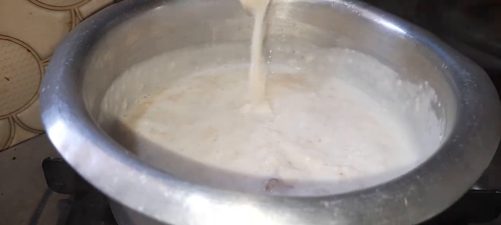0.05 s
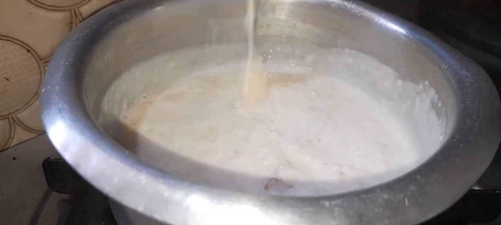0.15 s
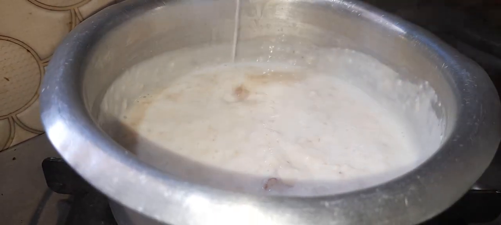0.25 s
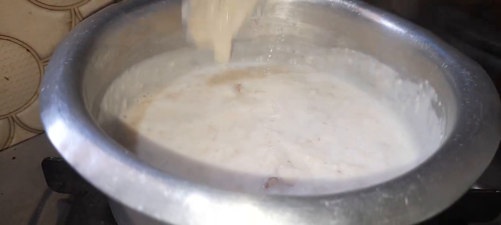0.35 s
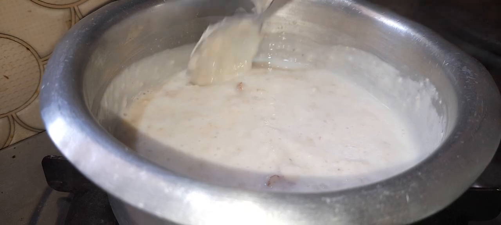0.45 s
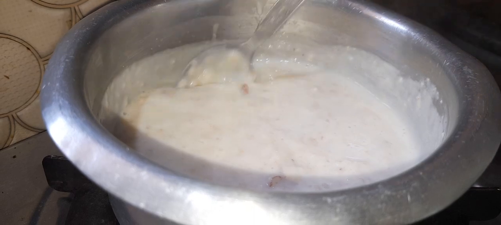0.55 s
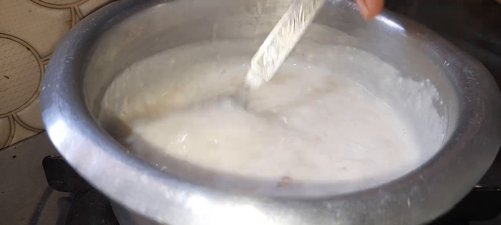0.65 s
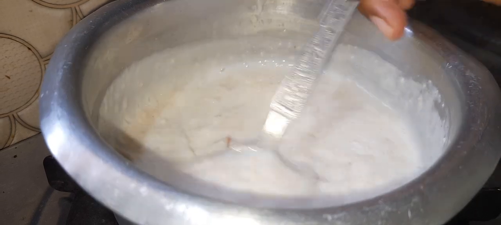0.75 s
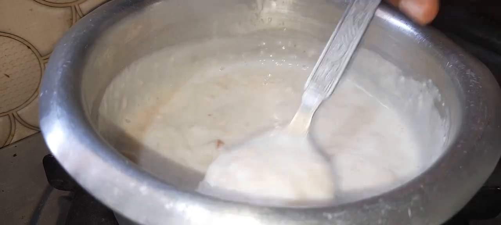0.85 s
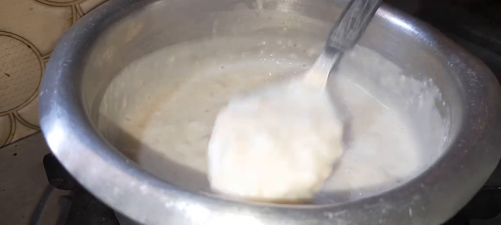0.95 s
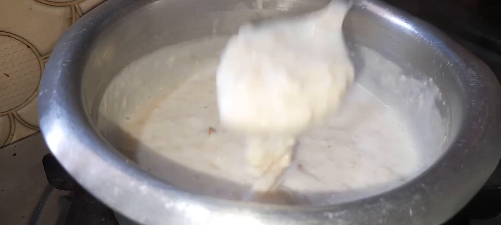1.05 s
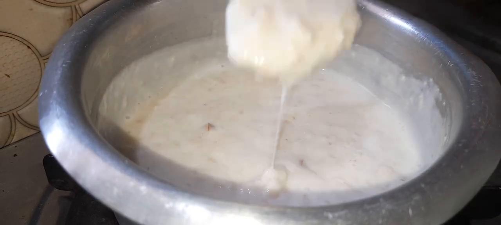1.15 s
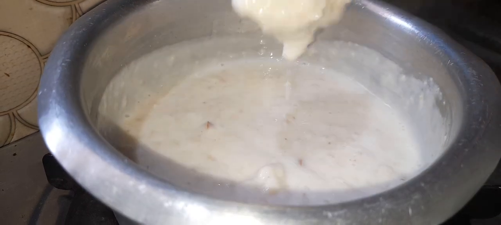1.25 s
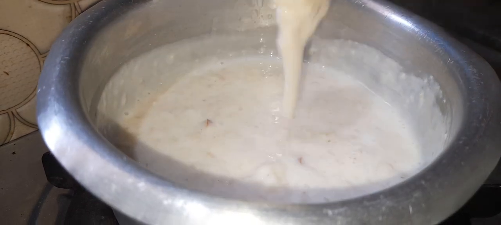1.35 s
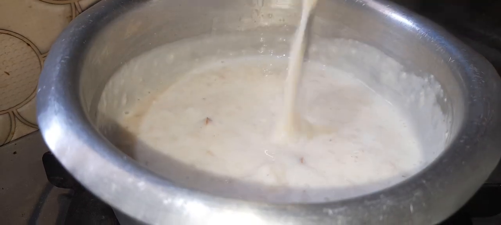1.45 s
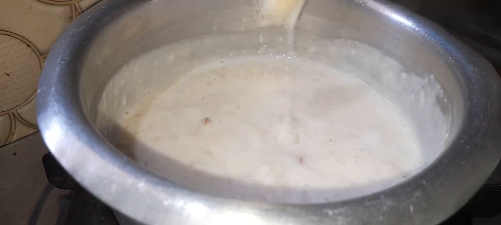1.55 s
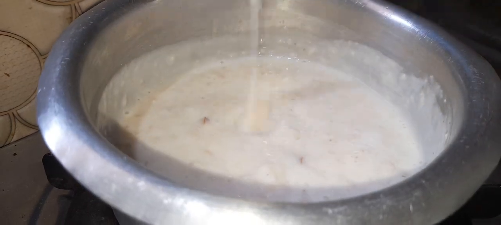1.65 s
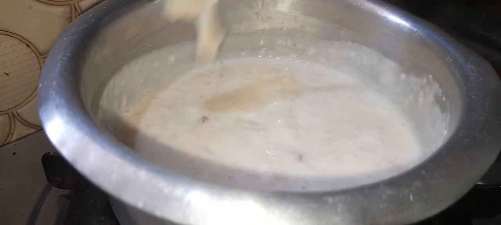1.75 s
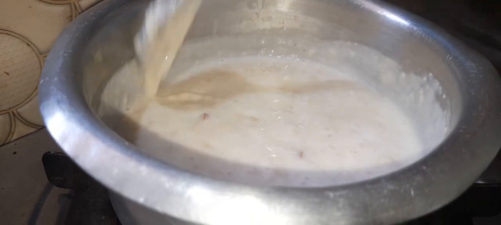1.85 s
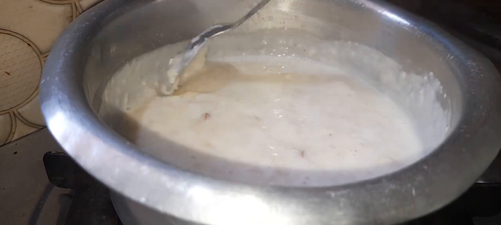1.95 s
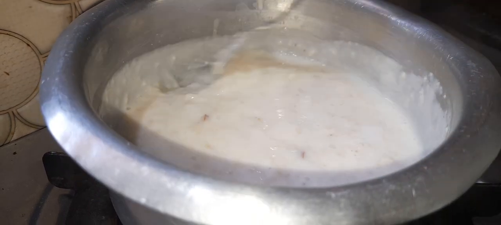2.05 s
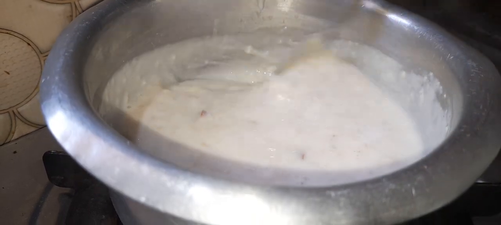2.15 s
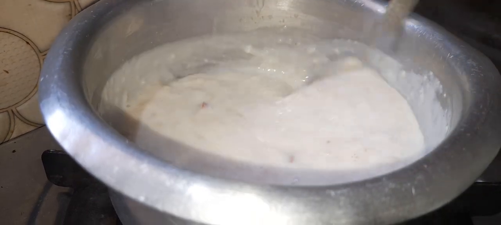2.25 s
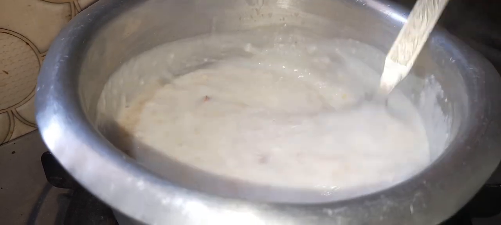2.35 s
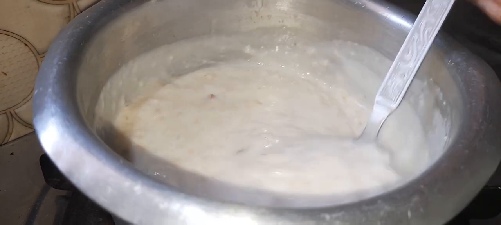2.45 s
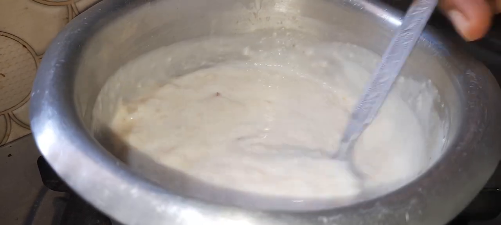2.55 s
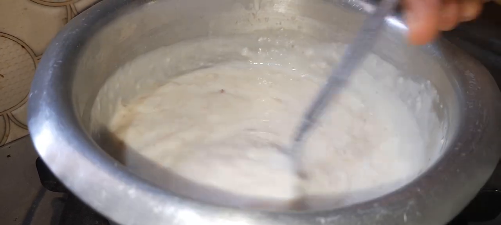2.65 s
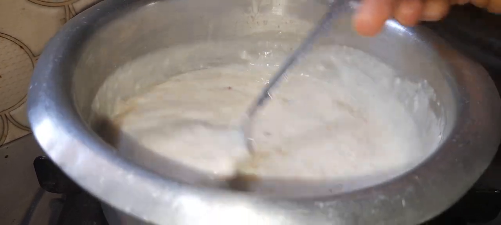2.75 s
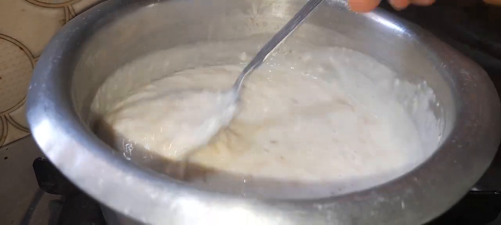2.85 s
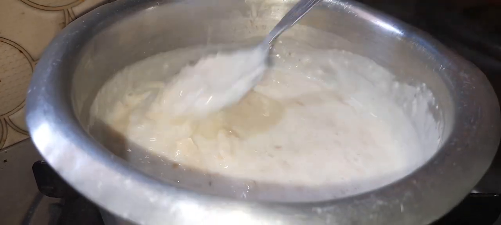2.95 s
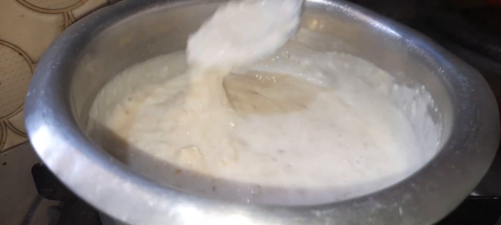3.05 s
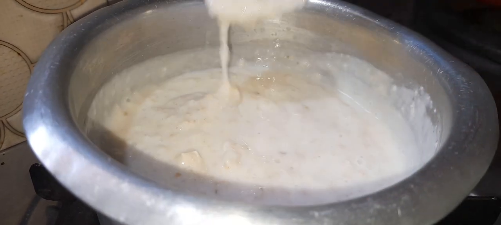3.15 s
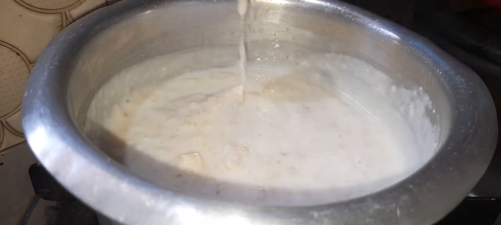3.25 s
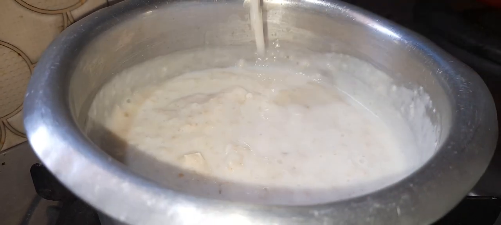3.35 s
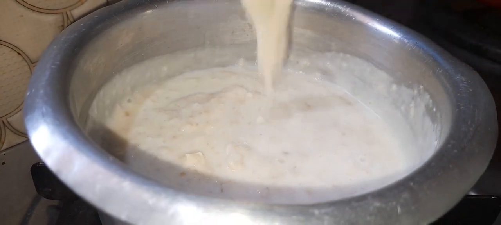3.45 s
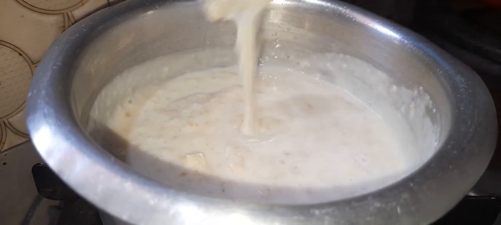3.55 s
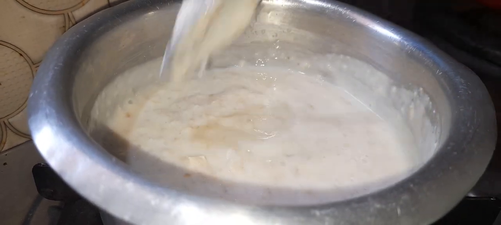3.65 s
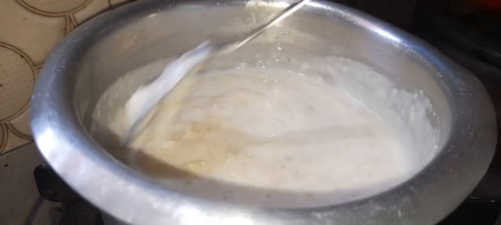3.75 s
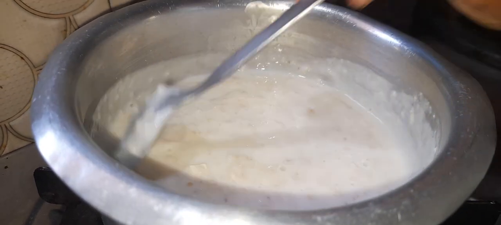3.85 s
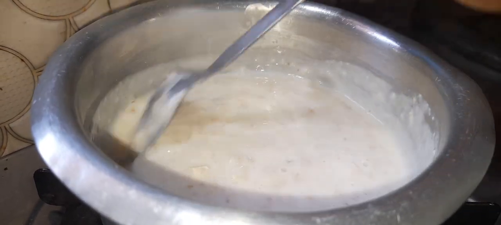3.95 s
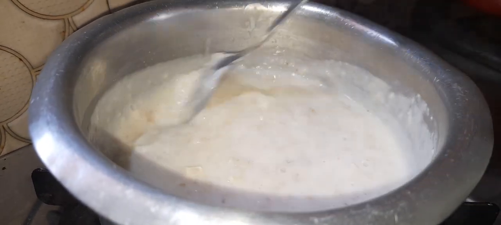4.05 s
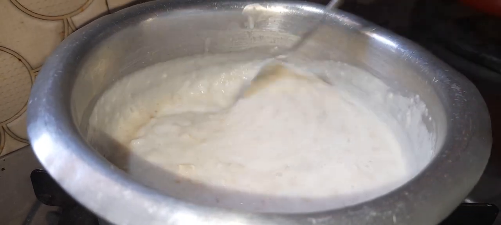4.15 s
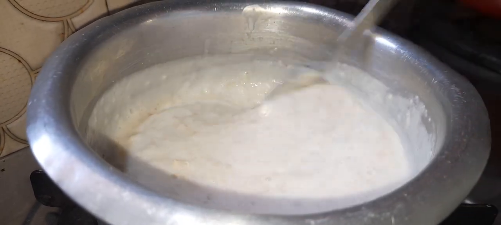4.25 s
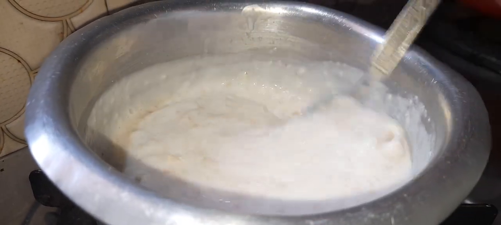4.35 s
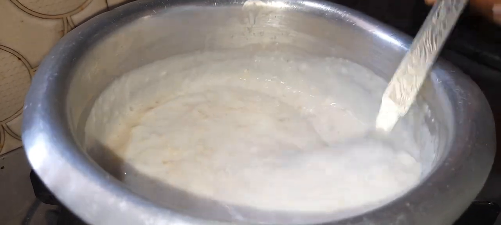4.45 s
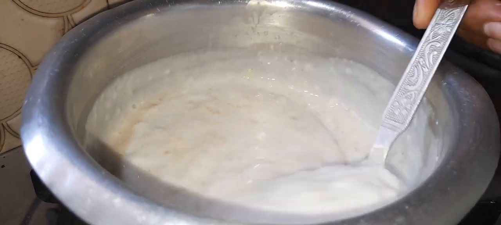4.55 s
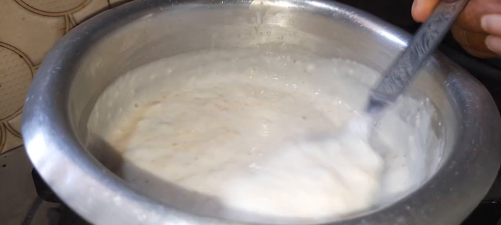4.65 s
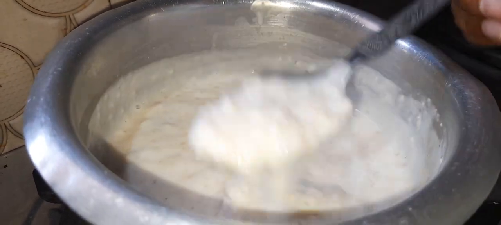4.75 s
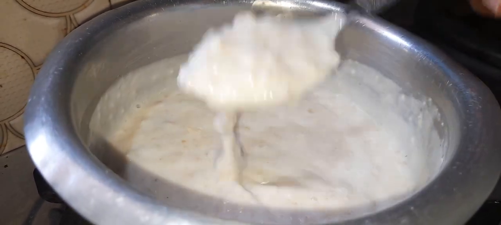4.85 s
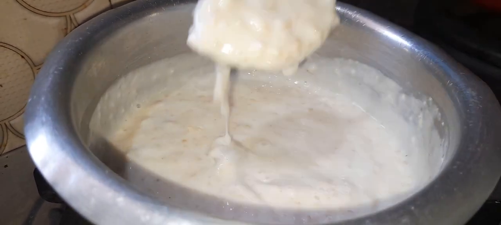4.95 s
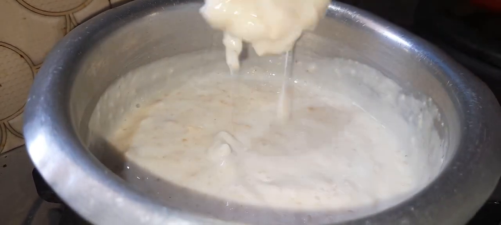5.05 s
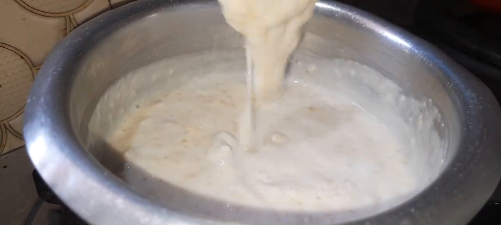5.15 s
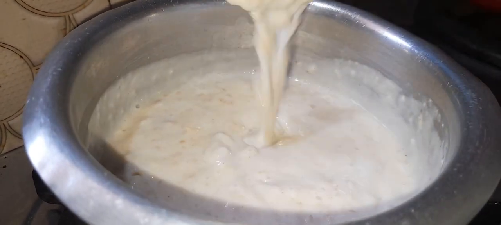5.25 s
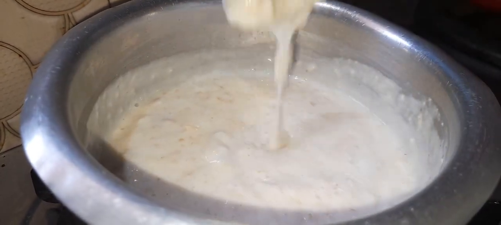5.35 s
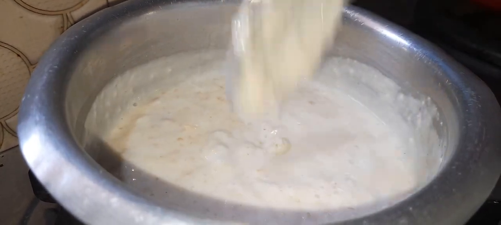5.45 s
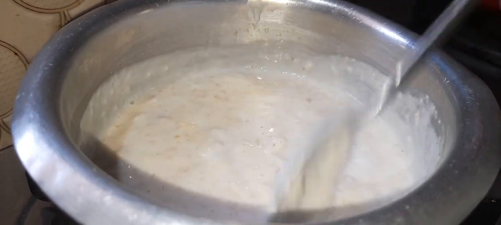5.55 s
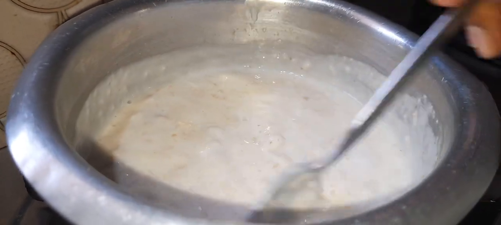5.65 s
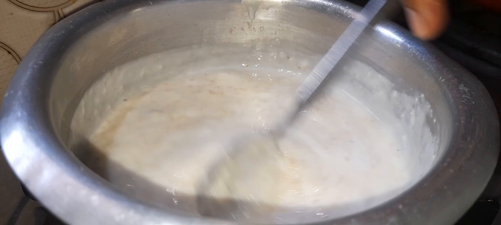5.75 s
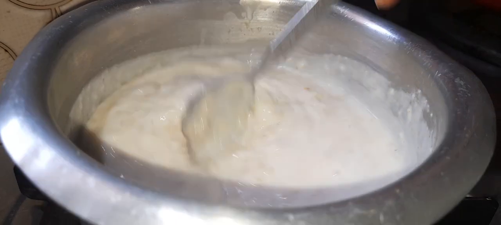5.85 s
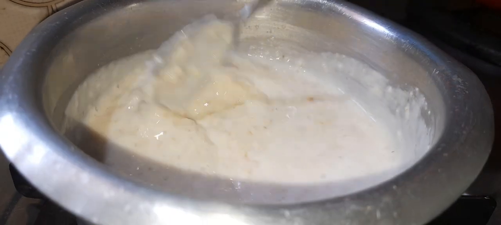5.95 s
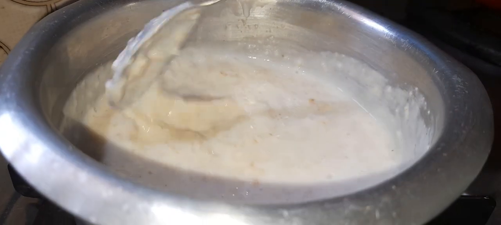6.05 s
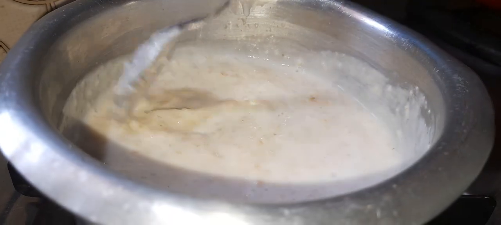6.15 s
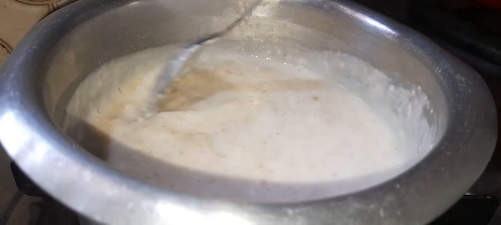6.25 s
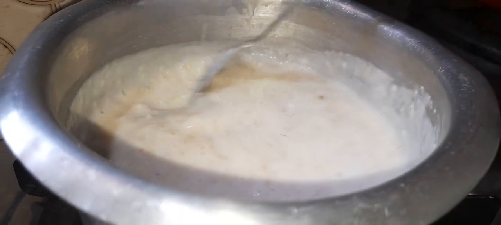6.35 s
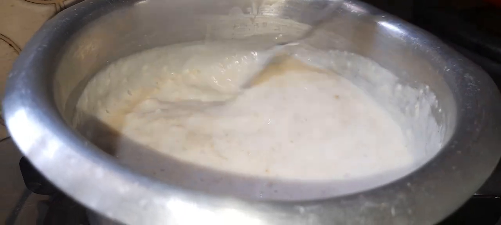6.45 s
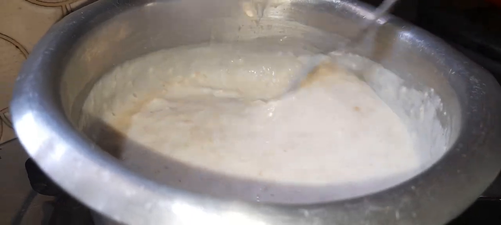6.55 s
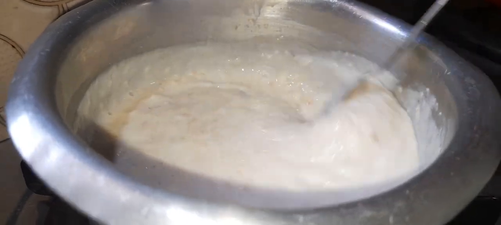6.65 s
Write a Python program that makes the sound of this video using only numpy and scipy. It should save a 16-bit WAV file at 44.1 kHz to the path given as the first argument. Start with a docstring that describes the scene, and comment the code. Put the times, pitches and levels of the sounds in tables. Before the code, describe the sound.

A phone close to a metal pot picks up irregular spoon strokes: hard clanks on the wall, duller thuds that rattle the pot on the stove, and brief rising metallic grating. Groups of contacts alternate with quieter gaps containing tiny wet smacks, soft room wash and slight hiss. A faint airy whoosh appears near the end.

```python
"""A steel spoon stirs thick porridge in a metal pot, close to a phone in a small kitchen.
Each knock excites a crack, ringing modes and a room tail; soft blows thud and rattle the pot on the stove.
Dragging the spoon's edge grates: random stick-slip impulses drive the pot and a gliding resonance.
Porridge damps the ring and slithers; tiny noise ticks are its wet smacks and brief scratches of the spoon.
Behind lie shaped noises: a low rumble, a soft wash, a distant whoosh with drifting resonances and hiss."""
import sys
import numpy as np
from scipy import signal
from scipy.fft import rfft, irfft
from scipy.io import wavfile
from scipy.ndimage import uniform_filter1d

SR = 44100
rng = np.random.default_rng(int(sys.argv[2]) if len(sys.argv) > 2 else 0)


def log_audio(samples):
    """Write samples as a 16-bit WAV file to the path given in sys.argv[1]."""
    # one column per channel
    frames = np.atleast_2d(samples).T
    # limit to full scale, then quantise
    limited = np.clip(frames, -1, 1)
    pcm = np.round(limited * 32767).astype(np.int16)
    wavfile.write(sys.argv[1], SR, pcm)


N = 295687
TIME = np.arange(N) / SR


def undb(db):
    """Level to amplitude: 20 dB is a factor of ten."""
    return 10 ** (np.asarray(db) / 20)


def rms(x):
    """Effective value: root of the mean square."""
    return np.sqrt(np.mean(x ** 2))


def fade(t, t60_s):
    """Exponential decay: the level falls 60 dB in t60_s."""
    return np.exp(-np.log(1000) * t / t60_s)


def pan(left_minus_right_db):
    """Level difference between the ports: left and right gains, half of it each way."""
    return undb(np.array([[left_minus_right_db], [-left_minus_right_db]]) / 2)


def band(x, low_hz, high_hz):
    """Causal band-pass filtering with a third-order Butterworth design."""
    edges_hz = [low_hz, min(high_hz, SR / 2 - 1)]
    return signal.sosfilt(signal.butter(N=3, Wn=edges_hz, btype="band", fs=SR, output="sos"), x)


def noise(size, spectrum, apart_hz):
    """Partial coherence: coloured stereo noise of rms 1, alike in the bass and unrelated above apart_hz."""
    f = np.arange(size // 2 + 1) * SR / size + 1
    hz, db = np.transpose(spectrum)
    colour = undb(np.interp(np.log(f), np.log(hz), db))
    gain = colour * np.minimum(f / hz[0], 1) ** 2  # extra roll-off below the first point
    mid, side = rfft(rng.standard_normal((2, size)))
    side = side * np.clip(f / apart_hz, .2, 1)
    x = irfft(gain * np.array([mid + side, mid - side]), size)
    return x / rms(x)


def walk(rate_hz):
    """Slow random modulation: normal random levels, rate_hz per second, joined by straight ramps."""
    size = int(SR / rate_hz)
    held = np.repeat(rng.standard_normal(N // size + 1), size)
    return uniform_filter1d(held, size)[:N]


def add(out, start_s, sound):
    """Superposition: mix a sound in at start_s."""
    start = max(int(start_s * SR), 0)
    out[:, start:start + sound.shape[1]] += sound[:, :N - start]


# levels of the background over time: time_s, rumble_db, wash_db (both before panning and flutter)
BACKGROUND_LEVELS = [(.3, -52.5, -56.5), (1.25, -58, -62.5), (1.8, -56.5, -63.5), (3.25, -59, -64.5),
                     (3.896, -56.5, -57), (5, -60.5, -62.5), (5.4, -59.5, -59), (6.2, -59.5, -58),
                     (6.7, -56.5, -60)]
# spectrum of the low rumble: frequency_hz, density_db (relative, per Hz)
RUMBLE_SPECTRUM = [(15, -65), (25, -38), (41, -14), (70, 1.5), (166, -4), (242, -20), (274, -9.5),
                   (430, -22.5), (500, -12.5), (650, -51), (1100, -120)]
# spectrum of the soft wash: frequency_hz, density_db (relative, per Hz)
WASH_SPECTRUM = [(200, -0.5), (330, 4), (470, -6), (620, 7.5), (820, -2.5), (1150, -6.5), (1600, -6.5),
                 (2400, -9.5), (3000, -19.5), (6000, -28)]
# spectrum of the hiss, also the raw noise of the ticks: frequency_hz, density_db (relative, per Hz)
HISS_SPECTRUM = [(2000, -3.5), (3500, -0.5), (5500, -1.5), (9000, -8.5), (12000, -1), (16000, -3.5)]


def background(hiss_db=-72):
    """Amplitude-modulated noise: an unsteady rumble, a wash that swells and sinks, and steady microphone hiss."""
    time_s, rumble_db, wash_db = np.transpose(BACKGROUND_LEVELS)
    rumble_level_db = np.interp(TIME, time_s, rumble_db) + 1.5 * walk(9)
    wash_level_db = np.interp(TIME, time_s, wash_db) + .8 * walk(12)
    rumble = noise(N, RUMBLE_SPECTRUM, apart_hz=440) * undb(rumble_level_db)
    wash = noise(N, WASH_SPECTRUM, apart_hz=1000) * undb(wash_level_db)
    hiss = undb(hiss_db) * noise(N, HISS_SPECTRUM, apart_hz=1500)
    return pan(-4.0) * rumble + pan(-2.1) * wash + hiss


def ringing(modes, t, muffle_per_khz=0, scatter_db=2, detune=0.0027):
    """Modal synthesis: decaying sines, each contact favouring other modes; porridge muffles the higher ones."""
    out = 0
    draws = rng.standard_normal((len(modes), 3))
    for (hz, db, t60_s, pan_db), (size, shift, skew) in zip(modes, draws):
        # the ports differ in phase, more so for higher modes
        port_phase = np.array([[1], [-1]]) * skew * min(hz / 1500, 1)
        phase = 2 * np.pi * hz * (1 + detune * shift) * t + port_phase
        damping = 1 + muffle_per_khz * hz / 1000
        mode = np.sin(phase) * fade(t, t60_s / damping)
        out = out + undb(db + scatter_db * size) * pan(pan_db) * mode
    return out


# first contact of metal on metal: frequency_hz, density_db (relative, per Hz)
CRACK_SPECTRUM = [(450, 6), (800, 3.5), (2300, -8), (2900, -10), (3600, -11), (4400, -3.5), (5500, -3),
                  (6700, -15), (8000, -13.5), (11000, -9), (16000, -21.5)]
# crowd of weaker shell modes: frequency_hz, density_db (relative, per Hz)
SHELL_SPECTRUM = [(60, -6), (150, -2), (300, 0), (460, -4), (750, 1), (1500, -2), (2300, -2), (2700, -15),
                  (3300, -15), (4400, -9), (5600, -14), (8200, -17), (11000, -13), (16000, -15)]
# spoon ringing free, bands near 4.6 and 6.7 kHz and a high one near 11 kHz:
# frequency_hz, density_db (relative, per Hz)
SPOON_SPECTRUM = [(3300, -52), (4100, 6.5), (4650, 8.5), (5000, 7), (5500, -58), (6100, 2), (6700, 7),
                  (7300, 2), (7900, -3.5), (10000, 0), (11200, 4.5), (15000, -0.5)]
# main modes of the filled pot, before scatter and muffling: frequency_hz, level_db, t60_s, left_minus_right_db
POT_MODES = [(84.9, -28.5, 0.61, -6), (160, -26, 0.66, -2), (182, -15, 0.34, -0.5), (212, -19, 0.16, 0),
             (254.4, -19.5, 0.58, 0), (315.8, -11.5, 0.41, -9), (298.8, -18, 0.32, -2),
             (292.2, -10.5, 0.18, -1), (336, -12, 0.031, 4), (355.6, -25, 0.33, 6),
             (424.5, -12.5, 0.069, 13), (490.5, -24.5, 0.54, -10), (561, -19.5, 0.32, 11.5),
             (586, -24.5, 0.58, 4), (720, -21.5, 0.46, -1), (958, -26, 0.13, -17), (1191, -22.5, 0.12, -11),
             (1400, -34, 0.17, -13), (1682, -20.5, 0.35, 2), (2096, -21, 0.18, 9), (2180, -20, 0.48, -7),
             (2256, -27.5, 0.38, -9), (2207, -3, 0.028, 11), (2930, -18, 0.43, -10), (4600, -25, 0.25, 12)]


def pot(ring_db, spoon_db, crack_db=5.5, muffle_per_khz=0, room_db=-8.0,
        crack_t60_s=0.0099, clank_t60_s=0.084, spoon_t60_s=0.26,
        room_t60_s=0.43, low_t60_s=0.75, spoon_coupling_db=-20, port_lag_s=.00027):
    """Impulse response to one tap: a crack, a short clank, ringing modes, the spoon and the kitchen's tail."""
    t = np.arange(SR * 3 // 4) / SR
    # the crack flies straight to the ports and reaches the left one first
    crack = noise(len(t), CRACK_SPECTRUM, apart_hz=835)[0] * fade(t, crack_t60_s)
    crack = np.array([crack, np.interp(t - port_lag_s, t, crack, left=0)])
    clank = noise(len(t), SHELL_SPECTRUM, apart_hz=900) * fade(t, clank_t60_s)
    # the kitchen's tail builds up gradually and holds the lows longer than the treble
    tail = noise(len(t), SHELL_SPECTRUM, apart_hz=790) * (1 - fade(t, 0.078))
    low_room = band(tail, 29, 500) * fade(t, low_t60_s)
    high_room = band(tail, 1040, 9900) * fade(t, room_t60_s)
    spoon = noise(len(t), SPOON_SPECTRUM, apart_hz=1000) * fade(t, spoon_t60_s)
    ring = clank + ringing(POT_MODES, t, muffle_per_khz)
    ring = ring + undb(room_db) * (low_room + high_room)
    ring = ring + undb(spoon_db + spoon_coupling_db) * spoon
    return undb(crack_db) * crack + undb(ring_db) * ring


def recolour(x, edges_hz, levels_db, blow_s=.04):
    """Minimum-phase equalisation: steers the first blow_s of a blow towards the given level in each band."""
    size = x.shape[1]
    f = np.arange(size // 2 + 1) * SR / size
    spectrum = rfft(x)
    bands = list(zip(edges_hz, edges_hz[1:]))
    now = []
    for low, high in bands:
        part = irfft(spectrum * ((f >= low) & (f < high)), size)
        now.append(rms(part[:, :int(blow_s * SR)]))
    # the gain is flat inside each band and slopes across the edges
    knots_hz = np.ravel([(low * 1.15, high / 1.15) for low, high in bands])
    log_gain = np.interp(f, knots_hz, np.repeat(np.log(undb(levels_db) / now), 2))
    # folding the cepstrum onto positive times makes the filter minimum-phase
    cepstrum = irfft(log_gain, size)
    cepstrum[1:size // 2] *= 2
    cepstrum[size // 2:] = 0
    return irfft(spectrum * np.exp(rfft(cepstrum)), size)


RING_DB, RING_DB_PER_DB, MEDIUM_BLOW_DB = 9, -0.08, -46.5  # light taps leave the pot freer to ring
SOFT_RATTLE_DB, HARD_RATTLE_DB = 1, -10.5  # soft blows on the bottom rock the pot on the stove
CUSHION_S, MUFFLE_PER_KHZ = 0.0028, 1  # a fully soft blow builds up slowly; its higher modes die sooner
# band levels of a blow, relative to its strength: stove_thud_db, bowl_boom_db, wall_db, clank_db, edge_tick_db
SOFT_BLOW_DB = (10, 6, 5, -2, -12)
HARD_BLOW_DB = (-10.5, 6.5, -1.5, 4, 0.5)
# limits of those five bands: edge_hz
KNOCK_EDGES_HZ = [55, 230, 440, 850, 2600, 17000]
# spoon on pot; the first row is a ring already dying away at the start:
# start_s, strength_db, hardness (0 = through porridge on the bottom, 1 = bare wall), crack_db,
# band offsets stove_thud_db, bowl_boom_db, wall_db, clank_db, edge_tick_db, then spoon_ring_db,
# rattle_s, settle_db (level change after the rattle), spot_hz (note of the struck spot), spot_db;
# crack, spoon ring and spot levels are relative, before recolouring
KNOCKS = [(0.002, -54.5, 0.011, -4, 3, 6.5, 0, 6, 2.5, -20, 0.057, -7, 950, -12),
          (0.5564, -34.5, 0.62, 20.5, -4.5, 1.5, -1, -5, 0.5, 13, 0.04, 2, 1040, 13),
          (0.767, -37.5, 0.17, 2, 1, 4.5, -0.5, 0.5, -1.5, -20, 0.05, -5, 773, 7),
          (1.848, -49, 0.16, 7, 1, 4, -5, -2, -1, -17, 0.08, 8, 2150, 2),
          (1.982, -42, 0.95, 21, -3, -20, -5.5, -5, 1, -15, 0.025, 3, 980, 8),
          (2.0059, -31.5, 0.74, 19.5, -1.5, -1.5, -4, 0.5, -0.5, -25, 0.018, -3, 1035, 11),
          (2.217, -40.5, 0.76, 15.5, -1.5, -5, -4.5, 0.5, 1.5, 1, 0.033, 1, 950, 12),
          (2.3119, -46, 0.88, 12, 1, 4.5, -9, 3.5, 1.5, -11, 0.03, 1, 2200, 19),
          (2.3886, -53, 1.17, 7, -3, -3, -18, 1, 0, -26, 0.028, -6, 1900, 5),
          (2.4042, -31.5, 0.45, 6, 1, -3.5, -4, -5.5, 0, -16, 0.04, -7.5, 1830, 7),
          (2.825, -44.5, 0.18, 18, -2, 5, 1, 0, 1, -19, 0.06, -4, 620, -7),
          (2.88, -47.5, 0.25, 16, 1.5, 0, 1.5, 0.5, -1, -27, 0.051, 0, 1200, 0),
          (3.9296, -32.5, 0.67, 17.5, 1, -4, 0.5, 4, 0.5, -15, 0.038, -1, 1210, 11.5),
          (4.0139, -41, 0.46, 10, 3, -0.5, -1, 0, -1, -13, 0.037, 0.5, 1000, 10),
          (4.128, -53, 0.59, 13, -2, 4, -7, -14, 0, 17, 0.04, 4, 720, 0),
          (4.2854, -53.5, 0.31, 12, 0, -3.5, -1.5, -5, -3, -13, 0.03, -3, 845, 6),
          (4.34, -39.5, 1.06, 14.5, 4, -3, -7, 3.5, -1, -24, 0.03, 6, 2000, 14),
          (4.381, -49, 0.66, 11, -3, -5, -2, -2, 2, -15, 0.03, 0, 1510, 14),
          (4.441, -45.5, 0.76, 11, 4, -17, -16, 3, 0.5, -15, 0.035, 10.5, 2220, 19),
          (4.498, -36, 0.33, 9, 1, 2.5, -0.5, -2, -1.5, -32, 0.025, -5, 553, 7),
          (4.548, -48, 0.31, -2, 2, 4.5, 3, -1, -1.5, -28, 0.02, 0, 700, 0),
          (5.695, -31.5, 0.7, 21, -4.5, 6, 2, 2.5, 1, 22.5, 0.06, -0.5, 730, 14.5),
          (5.901, -36, 0.28, 15, -2, 6, -3.5, -2.5, 0.5, -19, 0.017, -2, 666, -6)]


def knocks(rattle_t60_s=0.28, soft_hz=1100, settle_s=0.14, spot_t60_s=0.034, spot_lag_s=0.00027):
    """Impact excitation: hard wall knocks are bright; soft blows on the bottom thud and rattle the pot."""
    out = np.zeros((2, N))
    for (start_s, strength_db, hardness, crack_db, *offsets_db, spoon_db,
         rattle_s, settle_db, spot_hz, spot_db) in KNOCKS:
        softness = np.clip(1 - hardness, .01, 1)
        blow_db = (1 - hardness) * np.array(SOFT_BLOW_DB) + hardness * np.array(HARD_BLOW_DB)
        levels_db = strength_db + blow_db + offsets_db
        rattle_db = (1 - hardness) * SOFT_RATTLE_DB + hardness * HARD_RATTLE_DB
        ring_db = RING_DB + RING_DB_PER_DB * (strength_db - MEDIUM_BLOW_DB)
        tap = pot(ring_db, spoon_db, crack_db, MUFFLE_PER_KHZ * softness ** 2)
        t = TIME[:tap.shape[1]]
        # each spot of the wall gives its own short note, which reaches the right port later
        late = np.maximum([t, t - spot_lag_s], 0)
        spot = np.sin(2 * np.pi * spot_hz * late) * fade(late, spot_t60_s)
        tap = tap + undb(spot_db) * spot
        tap = tap * (1 - np.exp(-t / (CUSHION_S * softness ** 2)))
        # the rattle is a short run of fading, dull bumps at uneven times
        bumps = np.zeros(int(rattle_s * SR))
        when = (np.arange(7) + rng.uniform(.3, 1, size=7)) / 7 * (len(bumps) - 1)
        bumps[when.astype(int)] = fade(when / SR, rattle_t60_s) * rng.choice([-1, 1], len(when))
        bumps = bumps * undb(rattle_db) / np.sqrt(np.sum(bumps ** 2))
        rattle = signal.fftconvolve(tap, bumps[None])[:, :len(t)]
        tap = tap + band(rattle, 52, soft_hz)
        # once the rattle ends the level shifts, down or up, by settle_db
        tap = tap * undb(np.interp(t, [rattle_s, rattle_s + settle_s], [0, settle_db]))
        add(out, start_s, recolour(tap, KNOCK_EDGES_HZ, levels_db))
    return band(out, 62, 20000)


# small bright ticks, wet smacks of the porridge and brief scratches of the spoon:
# start_s, level_db (relative, before band-limiting), lowest_hz, t60_s
TICKS = [(0.0235, -43, 1200, 0.0094), (0.0768, -45, 4500, 0.01), (0.2192, -53, 4840, 0.012),
         (0.4173, -44.5, 10000, 0.012), (0.9607, -45, 4070, 0.0077), (2.056, -31, 8000, 0.02),
         (2.067, -25, 9400, 0.021), (2.282, -42, 4970, 0.01), (2.3185, -43, 7170, 0.011),
         (2.925, -43.5, 1500, 0.028), (3.7803, -56, 700, 0.03), (3.823, -46, 700, 0.04),
         (3.98, -32, 3500, 0.012), (4.0544, -35.5, 1500, 0.012), (4.188, -44.5, 1490, 0.024),
         (5.279, -53, 4000, 0.012), (5.303, -54, 3500, 0.012)]


def ticks(tick_db=-1, room_db=-27, room_t60_s=0.93):
    """Transient noise: porridge smacks and spoon scratches are band-limited bursts with a faint tail."""
    out = np.zeros((2, N))
    t = np.arange(SR // 4) / SR
    for start_s, level_db, lowest_hz, t60_s in TICKS:
        tick = band(noise(len(t), HISS_SPECTRUM, apart_hz=3040), lowest_hz, 12000)
        decay = fade(t, t60_s) + undb(room_db) * fade(t, room_t60_s)
        add(out, start_s, undb(level_db + tick_db) * tick * decay)
    return out


def gliding(force, hz, width_hz):
    """Heterodyne filtering: a steep-skirted resonance whose centre moves each sample; complex, real part rms 1."""
    turn = np.exp(2j * np.pi * np.cumsum(hz) / SR)
    low_pass = signal.butter(N=2, Wn=width_hz / 2, fs=SR)
    x = turn * signal.lfilter(*low_pass, force / turn)
    return x / rms(x.real)


# drifting resonances of the whoosh, before wavering: start_s, end_s, start_hz, end_hz, width_hz, level_db
WHOOSH = [(0.15, 0.54, 1240, 1140, 310, -65), (6.003, 6.36, 990, 980, 74, -57.5),
          (6.04, 6.45, 1150, 1204, 107, -62.5), (6.12, 6.55, 1480, 1500, 240, -64.5),
          (6.25, 6.745, 1650, 1800, 930, -66), (6.57, 6.75, 1440, 1480, 52, -64),
          (6.4, 6.75, 1030, 1140, 200, -63), (6.27, 6.75, 600, 650, 51, -58.5),
          (6.22, 6.52, 720, 780, 68, -62)]


def whoosh(slew_s=0.022, waver=0.017):
    """Time-varying resonance: noise through wavering, mostly rising resonances gives a faint distant whoosh."""
    out = 0
    for start_s, end_s, start_hz, end_hz, width_hz, level_db in WHOOSH:
        ramp_s = [start_s - slew_s, start_s + slew_s, end_s - slew_s, end_s + slew_s]
        swell = np.interp(TIME, ramp_s, [0, 1, 1, 0])
        hz = np.interp(TIME, [start_s, end_s], [start_hz, end_hz]) * (1 + waver * walk(15))
        air = gliding(rng.standard_normal((2, N)), hz, width_hz).real
        out = out + undb(level_db) * swell * air
    return out


STROKE_SAG_DB = -4  # the push at the start and end of a stroke, against its hardest
# spoon's edge pressed on the wall, before scatter: frequency_hz, level_db, t60_s, left_minus_right_db
EDGE_MODES = [(2210, -15.5, 0.055, 11), (2830, -21, 0.086, -5), (3540, -24.5, 0.12, 10),
              (3770, -21, 0.028, 13), (4200, -30, 0.12, 7), (4500, -33, 0.1, 1), (4630, -27, 0.21, 3),
              (5500, -19, 0.06, 4), (6940, -47, 0.1, 5), (7260, -51, 0.11, 5)]
# response of the grind, rasp, grit and hiss bands, in that order:
# level_db, by_push (dB per dB), by_brightness (dB per dB), by_rasp (dB per dB)
SCRAPE_BANDS = [(2.5, 1.76, -.5, -0.72), (0, 2, 0.28, 1), (3.5, 1.38, 2.04, 1.48), (1.5, 2, 1.5, 0.05)]
# limits of those four bands: edge_hz
STROKE_EDGES_HZ = [250, 1200, 2600, 6500, 17000]
# spoon edge dragged over metal, and at 2.92-3.13 s the faint slither of porridge off the spoon:
# start_s, hardest_push_s, end_s, level_db (before the band response), brightness_db, rasp_db (bare edge),
# contact_start_hz, contact_end_hz, contact_db (at the hardest push), contact_width_hz
STROKES = [(0.608, 0.676, 0.69, -48, 3.5, -5, 1010, 1180, -45.5, 380),
           (0.682, 0.712, 0.755, -40, 0, -2, 1450, 1870, -40.5, 380),
           (1.856, 1.93, 1.965, -59.5, -11.5, 1, 1920, 2100, -63, 380),
           (1.987, 2.007, 2.003, -50.5, 0.5, 4.5, 2050, 2160, -41, 380),
           (2.05, 2.054, 2.105, -40, -1.5, -4, 1010, 1300, -45, 300),
           (2.132, 2.211, 2.208, -46, -3.5, -1.5, 1540, 1870, -52.5, 380),
           (2.306, 2.397, 2.4, -48, -6, 6.5, 1760, 2220, -44, 300),
           (2.407, 2.438, 2.512, -41, -1, -1.5, 1820, 1610, -46, 380),
           (2.92, 2.98, 3.13, -61.5, -7, 4, 4770, 5170, -65.5, 1100),
           (2.973, 3.073, 3.12, -70, -6, 1, 7500, 7700, -75, 450),
           (4.064, 4.114, 4.21, -55, 1, -6.5, 1100, 1310, -69, 380),
           (4.343, 4.38, 4.41, -40, -4.5, 7.5, 1720, 1950, -36, 650),
           (4.398, 4.43, 4.49, -39, -8.5, 9.5, 2040, 2240, -34.5, 450)]


def scrapes_and_slither(slips_per_s=1000, scatter_db=4.5, judder_db=1.1, edge_s=0.0096, room_db=-14,
                        edge_ring_db=3, ring_per_rasp=0.87):
    """Stick-slip friction: random slips tap the pot and ring a gliding resonance; faint ones are a slither."""
    slipping = rng.random(N) < slips_per_s / SR
    slip_db = scatter_db * np.clip(rng.standard_normal(N), -1.5, 1.5) + judder_db * walk(90)
    slips = slipping * undb(slip_db) * rng.choice([-1, 1], N)
    out = np.zeros((2, N))
    for (start_s, peak_s, end_s, level_db, bright_db, rasp_db,
         from_hz, to_hz, contact_db, contact_width_hz) in STROKES:
        contact = np.interp(TIME, [start_s - edge_s, start_s, end_s, end_s + edge_s], [0, 1, 1, 0])
        now = contact > 0
        grating = slips[now] / rms(slips[now]) * contact[now]
        push_s = [start_s, np.clip(peak_s, start_s, end_s), end_s]
        push_db = np.interp(TIME[now], push_s, [STROKE_SAG_DB, 0, STROKE_SAG_DB])
        tap = pot(ring_db=2.0, spoon_db=-31, crack_db=8.5, muffle_per_khz=2.1, room_db=room_db)
        edge_ring = ringing(EDGE_MODES, TIME[:tap.shape[1]])
        tap = tap + undb(edge_ring_db + ring_per_rasp * rasp_db) * edge_ring
        for k, (band_db, by_push, by_bright, by_rasp) in enumerate(SCRAPE_BANDS):
            part = band(tap, STROKE_EDGES_HZ[k], STROKE_EDGES_HZ[k + 1])
            part = part / np.sqrt(np.sum(part ** 2) / 2)
            force_db = level_db + band_db + by_push * push_db + by_bright * bright_db + by_rasp * rasp_db
            force = grating * undb(force_db)
            add(out, start_s - edge_s, signal.fftconvolve(force[None], part))
        # the contact resonance reaches the two ports a quarter cycle apart
        glide_hz = np.geomspace(from_hz, to_hz, len(grating))
        grate = gliding(grating, glide_hz, contact_width_hz) * contact[now] * undb(contact_db + push_db)
        add(out, start_s - edge_s, np.array([grate.real, grate.imag]))
    return out


def left_bright(x, hinge_hz=3000, lean=0.22):
    """Directivity: the left port faces the pot and gets more treble, the right one less."""
    treble = signal.lfilter(*signal.butter(N=1, Wn=hinge_hz, btype="high", fs=SR), x)
    return x + lean * np.array([[1], [-1]]) * treble


def scene():
    """Superposition of spoon, pot, porridge and kitchen."""
    spoon_on_pot = left_bright(knocks() + scrapes_and_slither())
    return background() + spoon_on_pot + ticks() + whoosh()


def record(dry, top_hz=16050):
    """Band limitation: the phone cuts the top with a steep elliptic low-pass."""
    return signal.sosfilt(signal.ellip(10, .2, 80, top_hz, fs=SR, output="sos"), dry)


dry = scene()
out = record(dry)
log_audio(out)
```